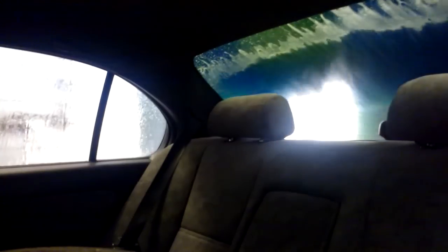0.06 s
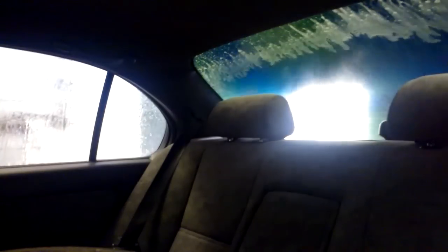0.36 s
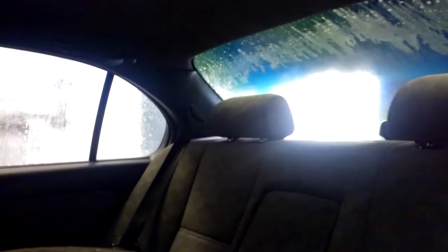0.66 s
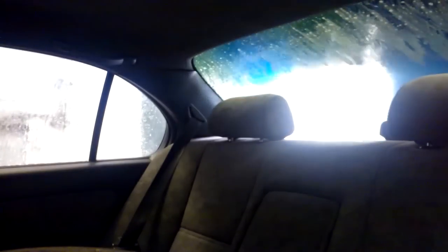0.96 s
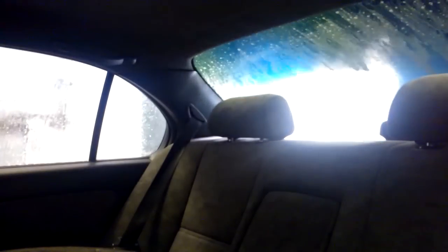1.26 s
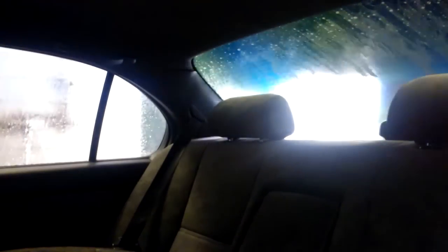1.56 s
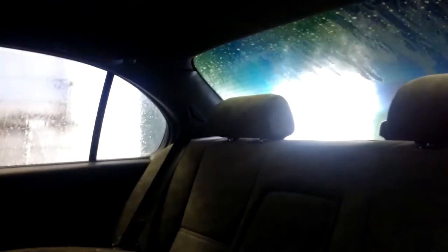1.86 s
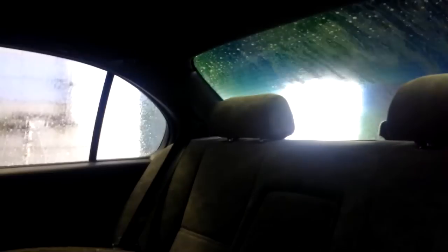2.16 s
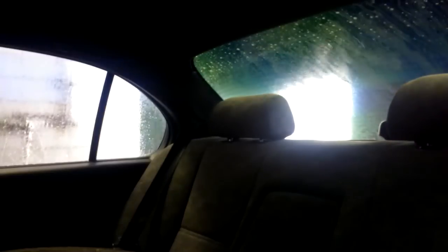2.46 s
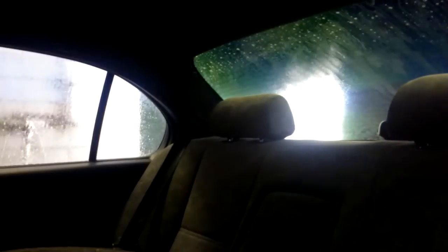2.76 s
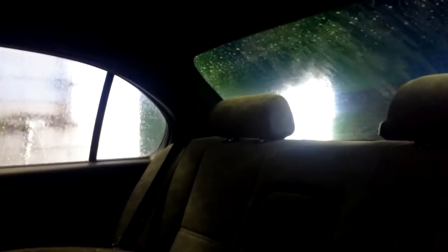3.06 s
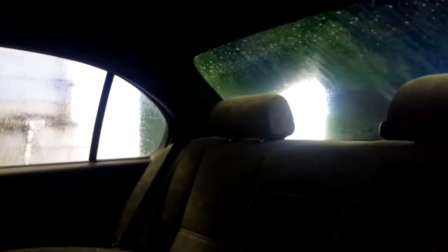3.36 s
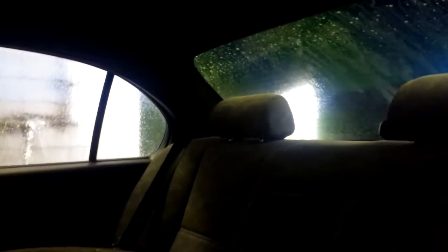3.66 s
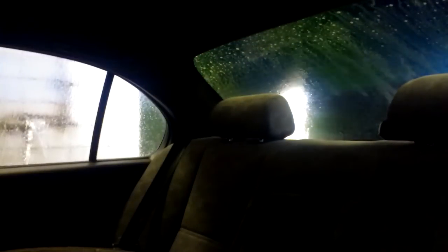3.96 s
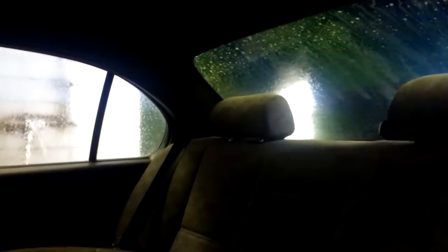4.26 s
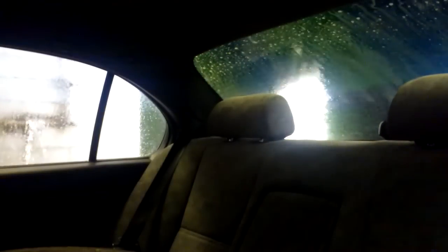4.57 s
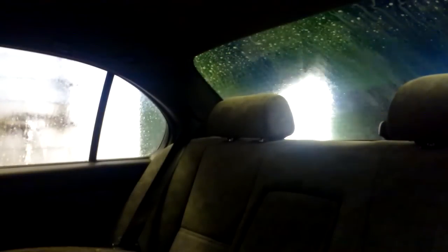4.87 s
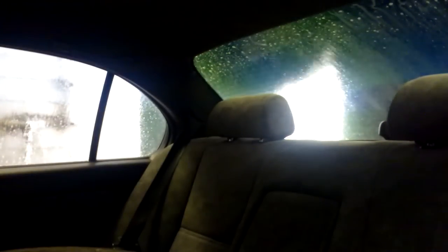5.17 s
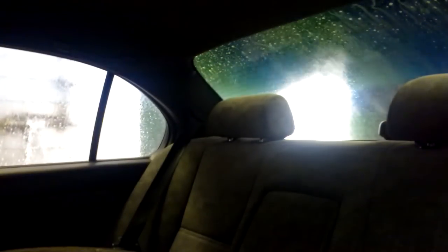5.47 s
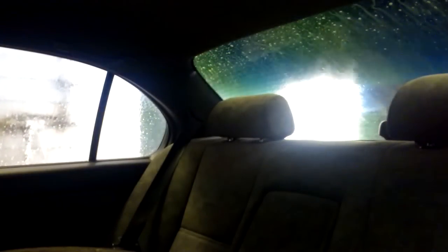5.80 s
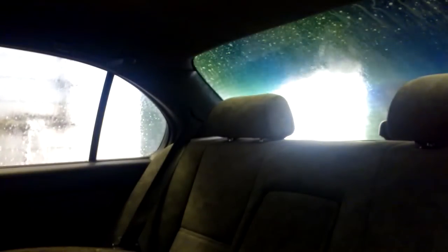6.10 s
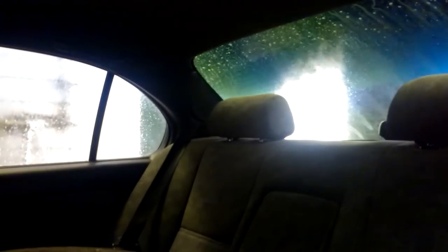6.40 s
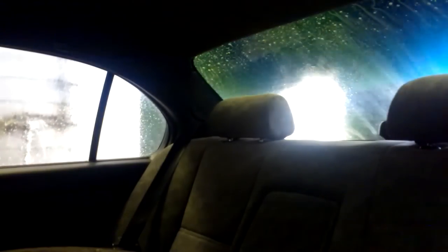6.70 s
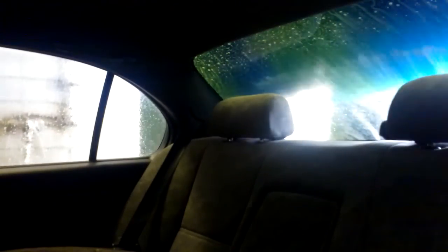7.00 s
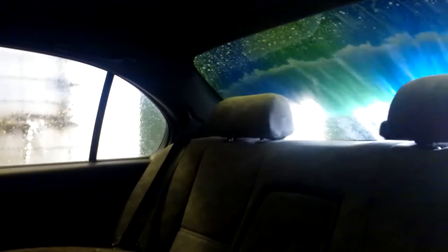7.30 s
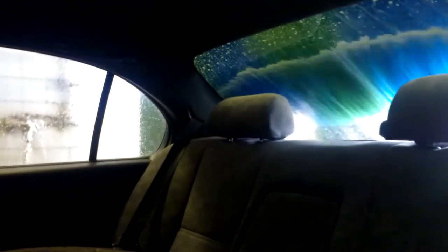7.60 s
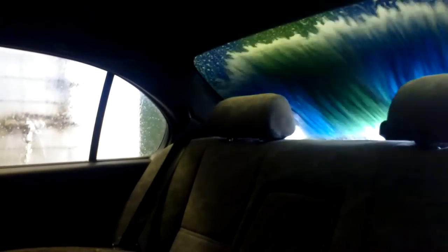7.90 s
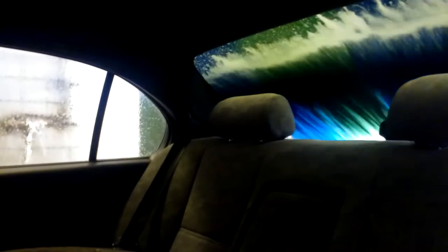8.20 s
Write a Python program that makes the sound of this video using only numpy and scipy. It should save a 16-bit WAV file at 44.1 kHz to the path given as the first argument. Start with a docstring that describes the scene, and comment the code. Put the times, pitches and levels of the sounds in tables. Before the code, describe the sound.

A brief hiss of spray on the rear window gives way to the deep, uneven drumming of rotating car wash brushes on the doors and roof. Muffled water swishes throughout over a faint drive whine, while the brushes surge and land dull blows. Then the hiss comes back, the drumming grows, and a loud wet rubbing on the glass finishes it. The microphone sits inside the closed cabin.

```python
"""A booming, drumming rumble under a swish of water, heard inside a closed car in an automatic wash.
Wet cloth strips of the rotating brushes slap the body and excite the modes of the cabin air, roof and
panels, over a faint drive whine. Spray from the top brush hisses on the rear window and fades as the
brush lifts off; near the end the spray returns, then the strips scrub the glass."""
import sys
import numpy as np
from scipy.fft import rfft, irfft, next_fast_len
from scipy.io import wavfile
from scipy.ndimage import uniform_filter1d, map_coordinates

SR = 44100
rng = np.random.default_rng(int(sys.argv[2]) if len(sys.argv) > 2 else 0)


def unload_audio(sound):
    """Save the sound as a 16-bit wav file, at the path given as the first command line argument."""
    columns = np.transpose(np.atleast_2d(sound))
    # keep every value between -1 and 1, then stretch to whole-number steps
    steps = np.round(np.clip(columns, -1, 1) * 32767)
    wavfile.write(sys.argv[1], SR, steps.astype(np.int16))


N = 372644

# Modes of the cabin air: pitch_hz, bandwidth_hz, level_db
CABIN_MODES = [(60, 9, 0), (77, 18, -7)]
# Modes of the doors and roof: pitch_hz, bandwidth_hz, level_db
ROOF_MODES = [(87.1, 11.2, -2.5), (112.3, 13.4, -3), (142.5, 18, -6.5)]
# Modes of the smaller panels: pitch_hz, bandwidth_hz, level_db
PANEL_MODES = [(168, 21.4, 1), (190.8, 34, 1), (240.5, 37, -2), (294.2, 24, -3.5), (326.2, 39.4, -6.5)]
# Modes of the window panes: pitch_hz, bandwidth_hz, level_db
PANE_MODES = [(310.5, 47, 1), (435, 164, -3), (534.6, 63, -2.5), (604.5, 35, -10)]
# Spectrum of the whole body shaking: frequency_hz, level_db
SWAY_SPECTRUM = [(8, -6), (18, 1), (27, 10), (32, 13), (41, 3.5), (50, -4), (90, -41), (300, -120)]
# Spectrum of wet strips, heard through the glass: frequency_hz, level_db
SWISH_SPECTRUM = [(250, -11), (500, 3), (700, 1.5), (1000, -1.3), (1400, -3.5), (1600, -7.5), (1850, -6),
                  (2550, -12), (2900, -10.5), (4200, -11.5), (4900, -21), (6500, -30.5), (8200, -51),
                  (14000, -70)]
# Spectrum of drops striking the rear window: frequency_hz, level_db
SPRAY_SPECTRUM = [(600, -5.5), (1500, -7), (2500, -6), (3300, -3), (4000, 1.5), (4500, -0.5), (4800, -7),
                  (5400, -7.5), (6500, -10), (7400, -19), (9000, -32), (15000, -45)]
# Spectrum of strips rubbing the rear window: frequency_hz, level_db
RUB_SPECTRUM = [(700, -21), (1900, 2.5), (2600, -2), (4400, 3), (4800, -9), (5200, -4.5), (6600, -8.5),
                (7500, -13.5), (9000, -17.5), (11000, -30), (15500, -44)]
# Spectrum of the microphone's self-noise: frequency_hz, level_db
HISS_SPECTRUM = [(3000, -18), (7000, 6), (10000, 0.5), (15500, -1.5)]
# The side brushes lean harder on the car: middle_s, half_length_s, boom_gain_db, thud_gain_db
SURGES = [(2.953, 0.51, 2.5, 7.5), (4.102, 0.52, 3, 1.5), (5.26, 0.52, 3.5, 7), (6.75, .38, 0, 4)]
# A heavy bunch of strips lands: middle_s, boom_gain_db
BLOWS = [(1.84, 8.5), (2.02, 7), (2.17, 5), (2.46, 3), (3.21, 3.5), (3.6, 6.5), (4.13, 4.5), (4.96, 6.5),
         (5.8, 8), (6.36, 8.5), (7.1, 9)]
# For a moment few strips land: middle_s, half_length_s, boom_loss_db
LULLS = [(.97, .08, 4.5), (1.327, .05, 10), (1.932, 0.053, 15), (3.475, 0.037, 3), (4.686, 0.072, 4),
         (6.0, .15, 2.5)]
# A soaked bunch of strips swishes over the side: middle_s, gain_db
SWIPES = [(4.52, 0.5), (4.9, 1), (5.32, 2.5)]
# How squarely the top brush faces the rear window: time_s, share (0-1)
FACING = [(0, 0.93), (.33, 0.55), (.49, 0), (6.87, 0.07), (7.1, 0.35), (7.32, 0.91), (7.55, .8), (7.8, 1),
          (8.45, 1)]
# What the top brush adds to each part: facing_gain_db, touching_gain_db
TOP_BOOM, TOP_THUD, TOP_DRUM = (-2.7, 4), (3.9, 1.7), (7.1, 6.8)
TOP_WATER, TOP_SPRAY = (2.74, 4.5), (0, 4.9)

# Base levels, before the brushes' movements raise or lower them
BOOM_DB, THUD_DB, DRUM_DB, SWISH_DB, PANE_DB = -21.5, -24, -27.5, -33.5, -31
SPRAY_DB, GRAZE_DB, SCRUB_DB = -38, -59, -32
# The top brush reaches the glass, takes hold over GRIP_S, then presses ever harder
CONTACT_S, GRIP_S, PRESS_DB_PER_S = 8.08, 0.17, 16
BAND_LIMIT_HZ = 15720
TIME_S = np.arange(N) / SR


def amp(db):
    """Decibels to amplitude ratio."""
    return 10 ** (np.asarray(db) / 20)


def unit(x):
    """x at rms 1."""
    return x / np.sqrt(np.mean(x ** 2) + 1e-20)


def swell(middle_s, half_s):
    """A Gaussian envelope, 1 at its middle."""
    return np.exp(-((TIME_S - middle_s) / half_s) ** 2)


def wobble(rate_hz):
    """Random modulation: a smooth curve through rate_hz knots a second."""
    return map_coordinates(rng.standard_normal(2048), [TIME_S * rate_hz], mode="wrap")


def filtered(x, response):
    """Linear filtering: the spectrum of x times a frequency response."""
    size = next_fast_len(N + SR // 2)
    return irfft(rfft(x, size) * response(np.fft.rfftfreq(size, 1 / SR)), size)[:N]


def coloured(x, spectrum):
    """Spectral shaping, interpolated on a log frequency axis, at rms 1."""
    points_hz, db = np.transpose(spectrum)
    return unit(filtered(x, lambda hz: amp(np.interp(np.log(hz + 1), np.log(points_hz), db))))


def ringing(x, modes, low_hz, high_hz):
    """Modal superposition: damped resonances of alternating sign radiate within a band, at rms 1."""
    def response(hz):
        body = sum((-1) ** k * amp(db) * 1j * hz * width / (pitch ** 2 - hz ** 2 + 1j * hz * width)
                   for k, (pitch, width, db) in enumerate(modes))
        band = (1 - 1 / (1 + (hz / low_hz) ** 6)) / (1 + (hz / high_hz) ** 6)
        return body * band
    return unit(filtered(x, response))


def impacts(rate_hz, scatter_db):
    """Shot noise: impulses at random moments, of scattered size and either sign, at rms 1."""
    size = amp(scatter_db * rng.standard_normal(N)) * np.sign(rng.standard_normal(N))
    return unit(size * (rng.random(N) < rate_hz / SR))


def even(x, span_s):
    """Division by the running rms holds the strength steady over times longer than span_s."""
    width = int(span_s * SR)
    power = uniform_filter1d(uniform_filter1d(x * x, width), width)
    return x / np.sqrt(np.abs(power) + 1e-9)


def top_brush():
    """Coupling to the rear window: how far the top brush faces it and how firmly it touches, both 0-1."""
    facing = np.interp(TIME_S, *np.transpose(FACING))
    touch = np.clip((TIME_S - CONTACT_S) / GRIP_S, 0, 1)
    return np.array([facing, touch])


def brush_slaps(flap, top):
    """Impact excitation: soft slaps ring the cabin air, roof and panels, louder as the brushes lean in."""
    lean_boom_db = sum(db * swell(s, half) for s, half, db, _ in SURGES)
    lean_thud_db = sum(db * swell(s, half) for s, half, _, db in SURGES)
    blow_db = sum(db * swell(s, half_s=0.056) for s, db in BLOWS)
    lull_db = sum(db * swell(s, half) for s, half, db in LULLS)
    boom_db = BOOM_DB + lean_boom_db + blow_db - lull_db + np.dot(TOP_BOOM, top) + 1.3 * wobble(12)
    thud_db = THUD_DB + lean_thud_db - 0.38 * lull_db + np.dot(TOP_THUD, top)
    drum_db = DRUM_DB + 0.68 * lean_thud_db - 0.22 * lull_db + np.dot(TOP_DRUM, top) + 0.44 * flap
    slaps = lambda: impacts(rate_hz=800, scatter_db=1.8)  # each part gets its own slaps
    boom = amp(boom_db) * even(ringing(slaps(), CABIN_MODES, low_hz=44, high_hz=100), span_s=0.096)
    thud = amp(thud_db) * even(ringing(slaps(), ROOF_MODES, low_hz=77.5, high_hz=168), span_s=0.18)
    drum = amp(drum_db) * even(ringing(slaps(), PANEL_MODES, low_hz=146.6, high_hz=414), span_s=0.14)
    return boom + thud + drum


def body_sway():
    """Random vibration: the whole body shakes at the lower edge of hearing."""
    return amp(-25) * even(coloured(rng.standard_normal(N), SWAY_SPECTRUM), span_s=0.32)


def water_swish(flap, top):
    """Wet strips swish in uneven strokes and ring the panes; transmission loss in glass dulls the treble."""
    swipe_db = sum(db * swell(s, half_s=0.05) for s, db in SWIPES)
    slack_db = 2.5 * swell(middle_s=0.96, half_s=0.12)
    swish_db = SWISH_DB + swipe_db - slack_db + 0.71 * flap + 0.17 * wobble(70)
    swish = even(coloured(impacts(rate_hz=13000, scatter_db=2), SWISH_SPECTRUM), span_s=0.14)
    knocks = impacts(rate_hz=1500, scatter_db=3.6)
    panes = even(ringing(knocks, PANE_MODES, low_hz=266, high_hz=740), span_s=0.11)
    return amp(np.dot(TOP_WATER, top)) * (amp(swish_db) * swish + amp(PANE_DB) * panes)


def window_spray(flap, top):
    """Shot noise: flung drops strike the rear glass in sheets, so densely that they merge into a hiss."""
    facing, _ = top
    spray_db = SPRAY_DB + np.dot(TOP_SPRAY, top) + 0.5 * flap + 1.4 * wobble(60)
    splash_db = 3.5 * swell(middle_s=7.39, half_s=0.05)
    drops = coloured(impacts(rate_hz=6500, scatter_db=5), SPRAY_SPECTRUM)
    return facing * amp(spray_db + splash_db) * drops


def drive_whine():
    """Narrow-band noise: the brush drive sounds as a faint, fuzzy tone."""
    pitch_hz, bandwidth_hz = 1682, 14
    tone = ringing(rng.standard_normal(N), [(pitch_hz, bandwidth_hz, 0)], low_hz=1400, high_hz=2000)
    return amp(-51.5) * tone


def microphone_hiss():
    """Self-noise: the microphone adds a steady treble hiss."""
    return amp(-61) * coloured(rng.standard_normal(N), HISS_SPECTRUM)


def window_scrub(top):
    """Friction: strips graze the rear glass, then grip it, rubbing brightly and shaking the pane."""
    facing, touch = top
    press_db = PRESS_DB_PER_S * np.clip(TIME_S - CONTACT_S - GRIP_S, 0, None)
    friction = amp(GRAZE_DB) * facing + amp(SCRUB_DB + press_db) * touch ** 2
    rub = amp(2.1 * wobble(80)) * coloured(impacts(rate_hz=9800, scatter_db=1.5), RUB_SPECTRUM)
    knocks = impacts(rate_hz=1500, scatter_db=2)
    shake = amp(9) * ringing(knocks, PANE_MODES, low_hz=368, high_hz=650)
    return friction * (rub + shake)


def scene():
    """Superposition: all sources add at one microphone in the upholstered cabin."""
    flap = wobble(24)  # strips land in bunches
    top = top_brush()
    body = brush_slaps(flap, top) + body_sway()
    water = water_swish(flap, top) + window_spray(flap, top)
    return (body + water + drive_whine() + microphone_hiss() + window_scrub(top))[None]


def record(dry):
    """An ideal low-pass filter: nothing above the band limit passes."""
    return filtered(dry[0], lambda hz: hz < BAND_LIMIT_HZ)[None]


dry = scene()
out = record(dry)
unload_audio(out)
```